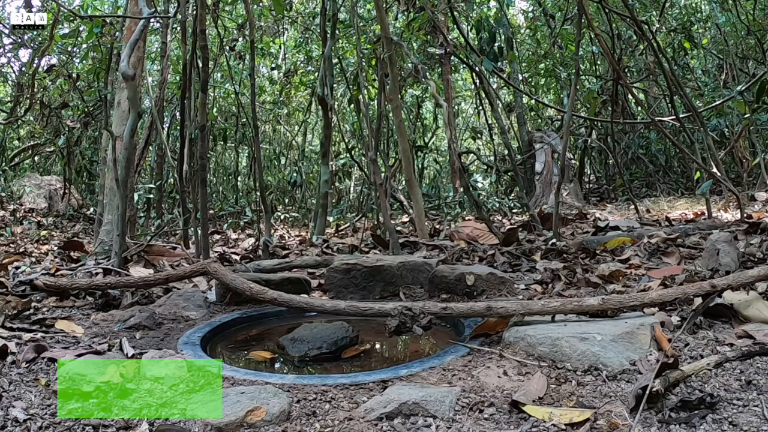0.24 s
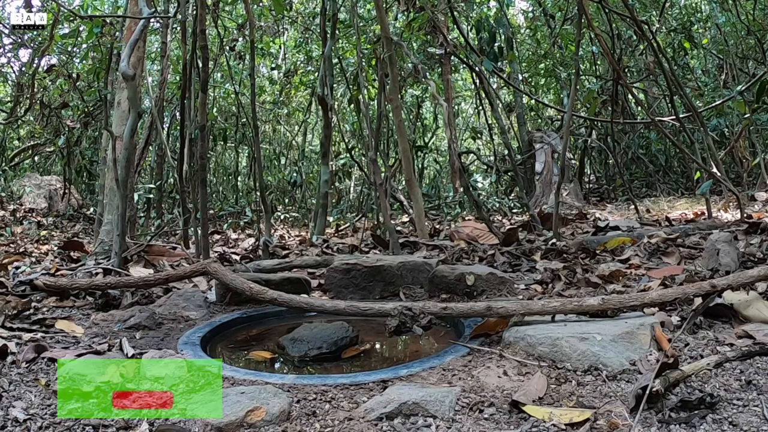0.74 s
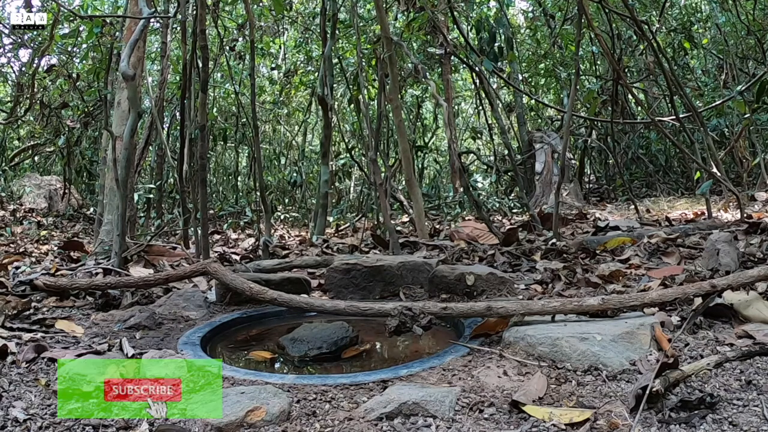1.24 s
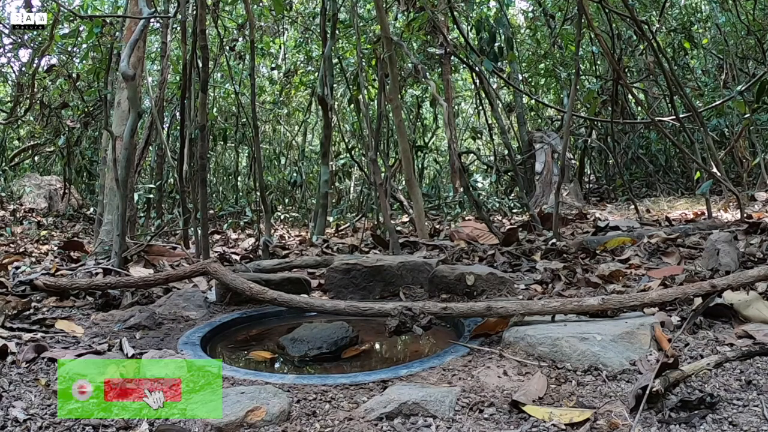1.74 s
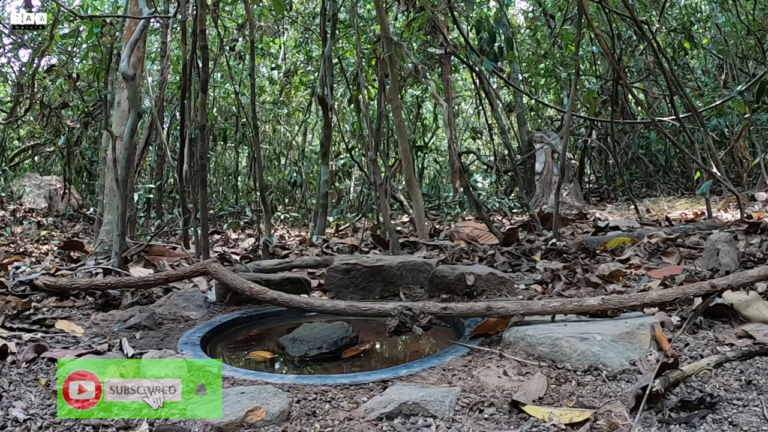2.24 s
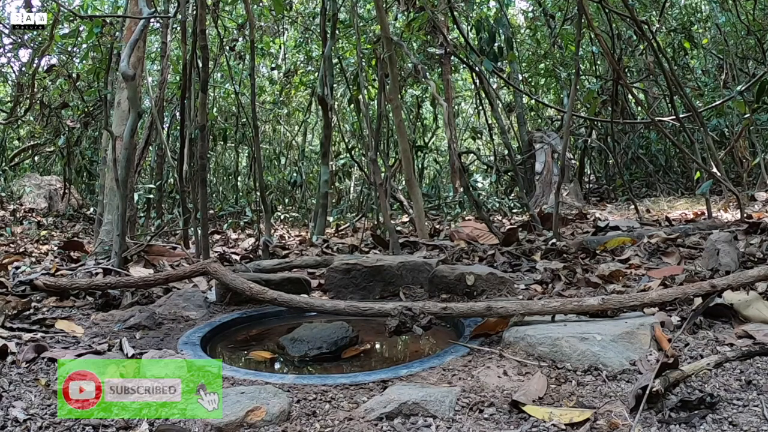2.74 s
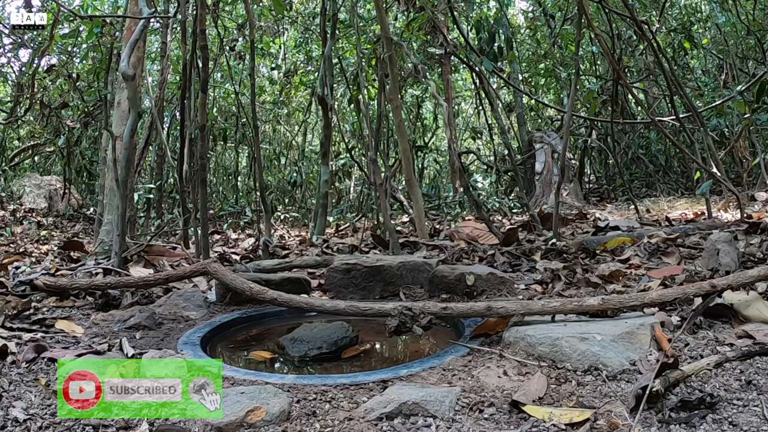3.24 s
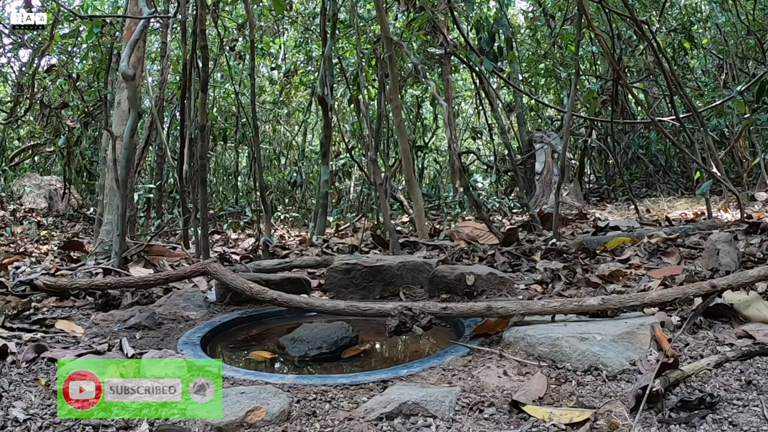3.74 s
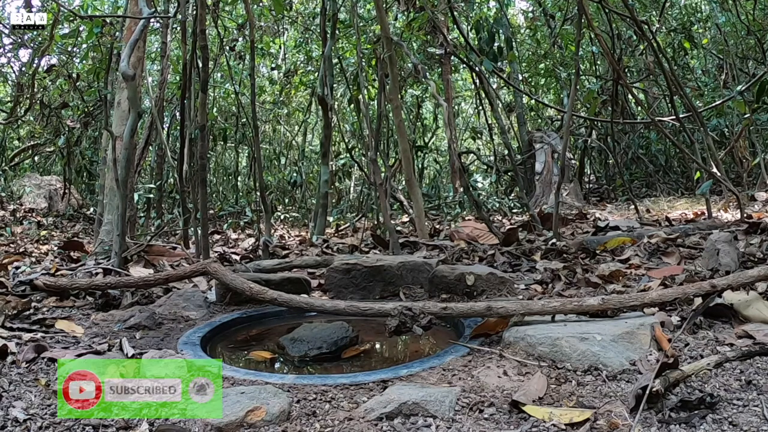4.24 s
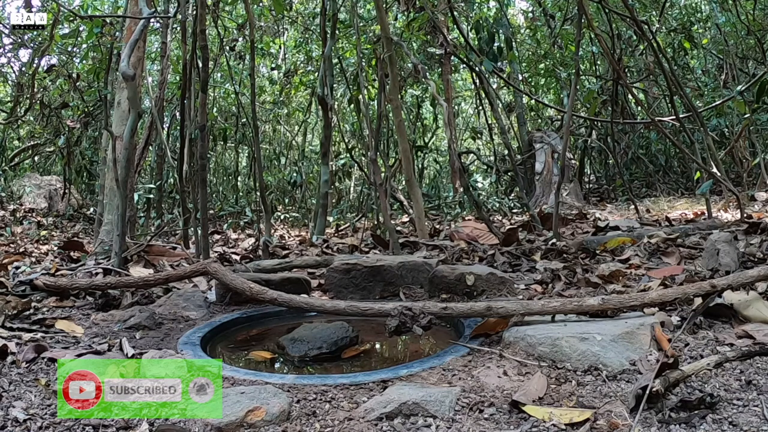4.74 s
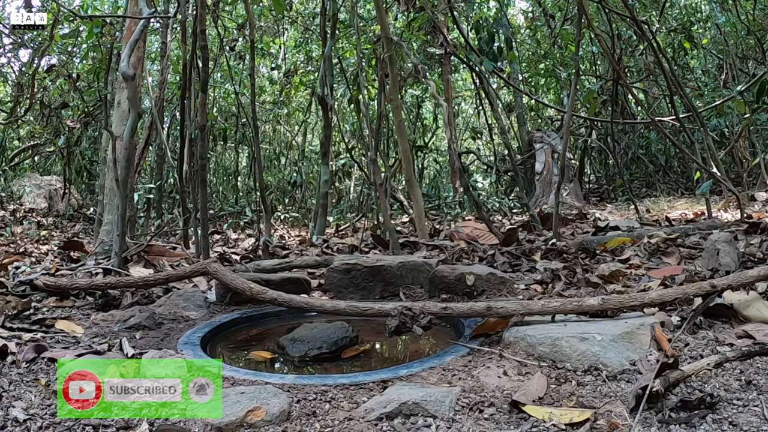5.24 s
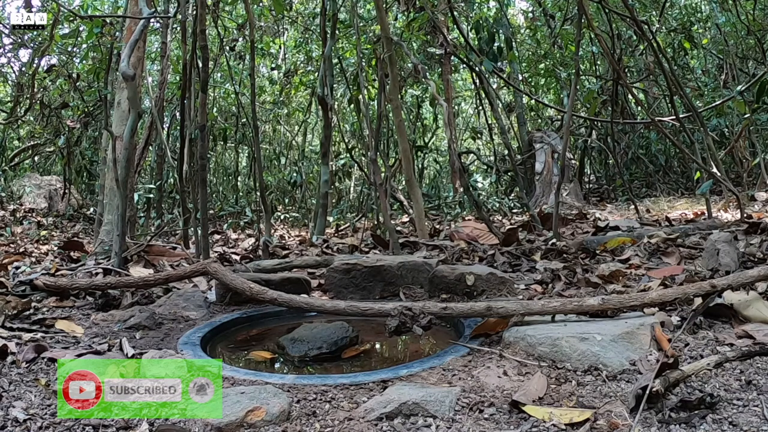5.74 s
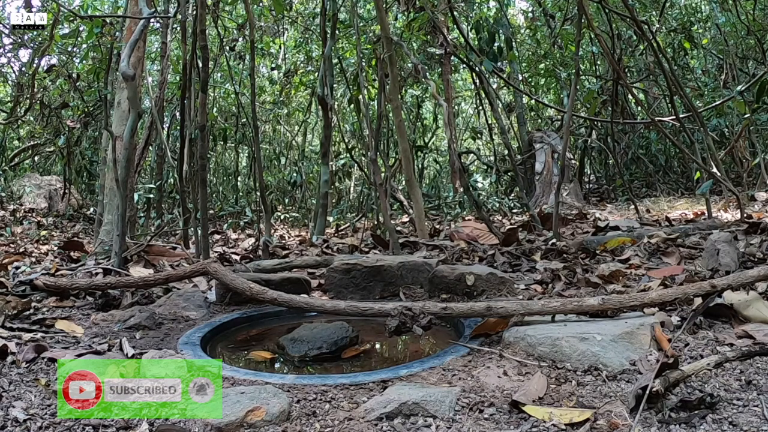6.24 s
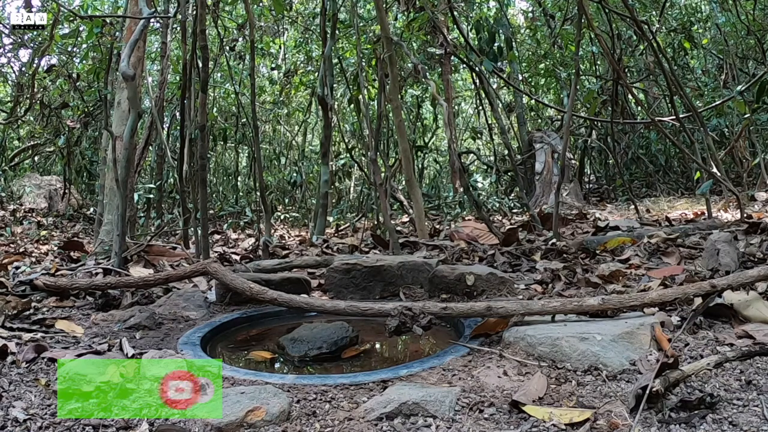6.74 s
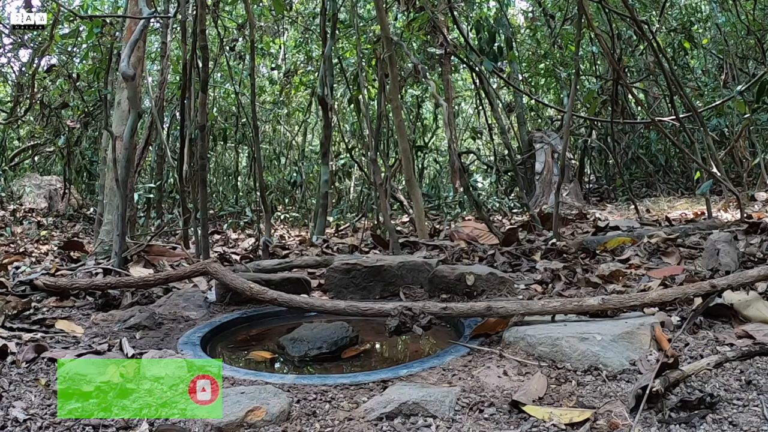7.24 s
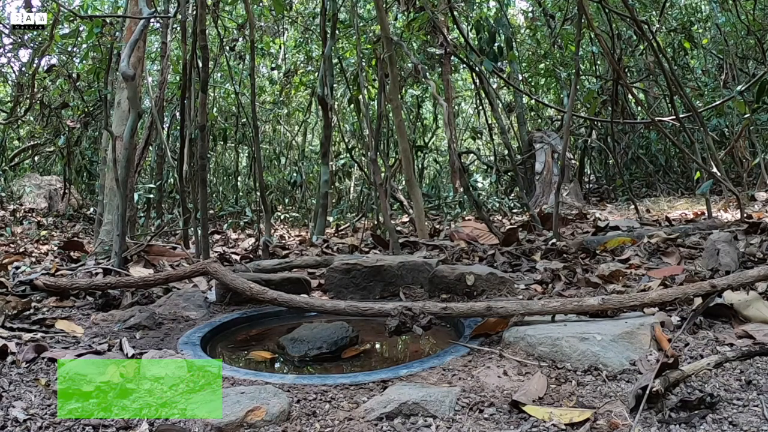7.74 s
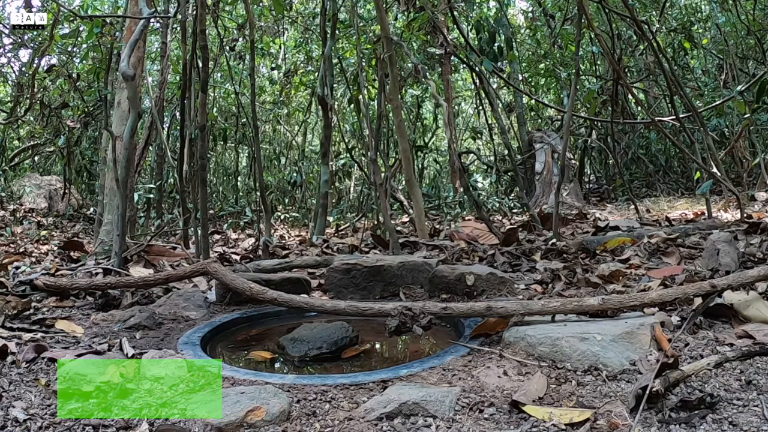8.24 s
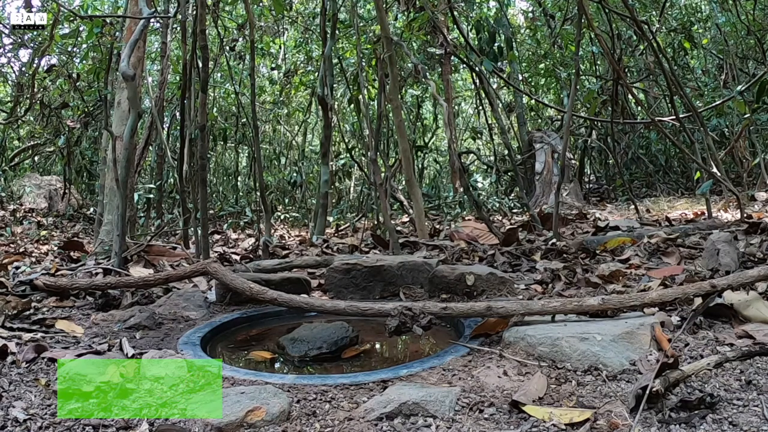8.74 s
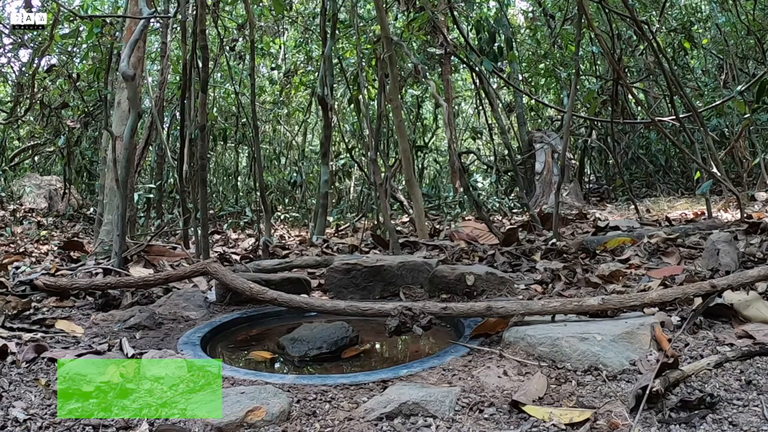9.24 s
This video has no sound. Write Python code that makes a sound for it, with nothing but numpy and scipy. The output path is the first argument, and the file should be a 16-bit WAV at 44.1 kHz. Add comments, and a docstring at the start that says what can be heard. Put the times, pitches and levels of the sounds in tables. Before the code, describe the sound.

Quiet forest floor in stereo. A close bird repeats a short nasal call snapping upward into a whip, seven times in the first few seconds. A soft dove-like three-note hoot comes early, midway and near the end. Thin whistles and hoarse slurs echo among far trees; later come harsh close chirps, a low woody chuck and rattling trills. Brief wing flutters, dry leaf crackle and faint insects fill the gaps.

```python
"""Forest floor beside a water dish, two microphones: a near bird gives seven nasal calls ending in a whip.
A dove-like bird hoots a three-note phrase; others pipe, chirp, chuck, whistle, slur and trill, near and far.
Bird voices are gliding tones or harmonic stacks with shaken pitch; wings, leaves and air are coloured noise.
Insects throb in narrow noise bands over a low hum, and a faint drone swells near the end.
Echoes from trunks and leaves surround the birds, the wings, the stirred leaves and the drone."""
import sys
import numpy as np
from scipy import signal
from scipy.fft import rfft, irfft, next_fast_len
from scipy.io import wavfile

SR = 44100
rng = np.random.default_rng(int(sys.argv[2]) if len(sys.argv) > 2 else 0)


def log_audio(samples):
    """Write samples as a 16-bit WAV file to the path given in sys.argv[1]."""
    # one column per channel
    frames = np.atleast_2d(samples).T
    # limit to full scale, then quantise
    limited = np.clip(frames, -1, 1)
    pcm = np.round(limited * 32767).astype(np.int16)
    wavfile.write(sys.argv[1], SR, pcm)


N = 418950  # samples, 9.5 s

# In all tables: pan_db is left over right, echo_db is echo over direct sound, rough shakes the pitch.

# near bird, one row per call: start_s, whip_start_s, lead_db, pip_hz, pip_db, whip_length_s, whip_top_hz,
# climb_time (share of whip), whip_db, whip_echo_db, pan_db; its levels are before the bird's overall gain
WHIP_CALLS = [(1.018, 1.082, -26.5, 3400, -19.5, .027, 5020, .45, -16, -3.5, 4),
              (1.228, 1.299, -28.5, 3200, -28.5, .029, 4570, .3, -18, 0, 5),
              (1.530, 1.602, -31, 3150, -26, .029, 4260, .22, -19, .5, 1),
              (1.724, 1.790, -32, 3150, -27.5, .028, 4200, .24, -23.5, 1, 3),
              (1.954, 2.022, -32, 3000, -28.5, .026, 4150, .2, -21.5, 1.5, 2),
              (2.548, 2.617, -34, 3250, -33, .03, 4000, .2, -28.5, 1.5, 2),
              (3.244, 3.309, -34.5, 3200, -31, .024, 4400, .18, -32.5, 1.5, 0)]
PIP_S, PIP_LEAD_S, PIP_FALL_HZ = .015, .016, 220
WHIP_CLIMB = .19  # the whip starts this share below its top
CRACK_S = .004  # the voice cracks between pip and whip
# nasal lead-in: time (share of its length), pitch_hz (before a small wander), relative level_db, rough (0-1)
LEAD_IN = [(0, 720, -10, .1), (.08, 750, -4, .1), (.22, 780, -4, .12), (.36, 750, -7, .3),
           (.48, 780, -7, .7), (.6, 880, -7, .6), (.7, 930, -3, .2), (.86, 870, 0, .2), (1, 820, -4, .35)]
# resonance of the nasal throat: freq_hz, relative level_db
NASAL_THROAT = [(700, -38), (1200, -24), (1500, -9), (1800, -4), (2300, -4), (2700, 0), (3100, 1),
                (3700, -12), (4400, -28), (8000, -40)]

# hooted phrases: start_s, level_db
HOOT_PHRASES = [(1.627, -36), (5.131, -36), (8.364, -36)]
# grace note and three scooped hoots: start_s (in the phrase), length_s, start_hz, middle_hz, end_hz,
# level_db (relative to the phrase)
HOOTS = [(-.004, .05, 890, 810, 790, -10.5), (.038, .112, 915, 815, 805, 1), (.23, .112, 795, 716, 805, -1),
         (.4, .145, 690, 745, 845, 0.2)]
HOOT_EDGES = .8  # share of a hoot spent swelling and fading

# clear piping notes near 1 kHz: start_s, length_s, start_hz, end_hz, level_db (where the swell ends),
# overtone_db (relative), pan_db
PIPES = [(.05, .05, 1150, 1270, -56, -20, 0), (.105, .03, 1300, 980, -53, -20, 0),
         (.16, .04, 1230, 980, -56, -20, 0), (1.63, .158, 1070, 1035, -37.5, -25, 0),
         (1.782, .065, 950, 800, -43, -25, 0), (3.98, .06, 1020, 940, -46, -11, -8),
         (8.078, .035, 1100, 1140, -53, -20, 0), (8.215, .158, 1045, 1065, -41.5, -20, 0),
         (8.366, .038, 1010, 810, -45, -20, 0)]
# run of sharp close chirps: start_s, length_s, start_hz, middle_hz, end_hz, level_db, rough (0 pure, 1 harsh)
CHIRPS = [(6.247, .042, 2150, 2600, 2650, -34, 1), (6.281, .02, 1500, 2250, 1850, -37, .25),
          (6.331, .027, 1650, 2100, 2850, -35, .55), (6.356, .043, 1550, 3000, 1100, -30, .08)]
# chirp harmonics, from the first up: pure_db, harsh_db (added in proportion to rough)
CHIRP_PARTIALS = [(-22, 13), (0, 0), (-13, 9), (-22, 8)]
# colour of the chirping beak: freq_hz, relative level_db
CHIRP_BEAK = [(1500, -3), (4000, 0), (7800, -1), (9000, -15), (14000, -28)]
# falling harmonic chucks: start_s, length_s, start_hz, end_hz, level_db (before the fall), throat_factor (pitch),
# pan_db, echo_db
CHUCKS = [(4.93, .065, 490, 370, -43, .78, -7, 0), (6.996, .072, 445, 296, -29, 1.0, -2, -14),
          (7.212, .055, 450, 330, -47, .72, -7, -4), (7.505, .05, 450, 330, -55, .66, -2, 2),
          (8.365, .055, 490, 380, -46, .66, 2, -4), (9.075, .06, 460, 350, -45, .66, -5, -4)]
# resonance of the chucking throat before it shifts: freq_hz, relative level_db
CHUCK_THROAT = [(440, -42), (860, -11), (1300, -14), (1750, -7), (2200, -7), (2650, 2), (3050, 2),
                (3450, -12), (3900, -6), (4400, -19), (5100, -40)]

# long whistles that swoop down and creep up again: start_s, level_db
SWOOPS = [(.548, -45), (2.137, -46.5)]
# shape of a swoop: time_s (in the call), pitch_hz, relative level_db, quaver (share of the pitch)
SWOOP_SHAPE = [(0, 2850, -12, 0), (.014, 3280, -4, 0), (.034, 3230, -2, 0), (.05, 2720, -5, 0),
               (.08, 2480, -6, 0), (.09, 2250, -16, 0), (.099, 2080, -1, 0), (.125, 1800, 0, 0),
               (.165, 1770, 2, .01), (.2, 1880, -1, .06), (.28, 2000, -2, .07), (.34, 2050, -9, .05)]
QUAVER_HZ = 52
# thin far whistles: start_s, length_s, start_hz, end_hz, level_db
THIN_WHISTLES = [(.235, .035, 1750, 1800, -52), (2.33, .2, 2930, 3000, -55), (2.79, .18, 1960, 1880, -51.5),
                 (2.98, .12, 1820, 1680, -55), (3.145, .08, 3950, 3650, -48),
                 (3.52, .07, 2420, 2500, -44.5), (3.6, .25, 2500, 2830, -55), (3.9, .08, 3580, 3500, -55),
                 (4.375, .06, 1400, 1280, -50), (6.0, .045, 3750, 3650, -41),
                 (6.66, .18, 2250, 2020, -51.5), (6.87, .12, 2400, 2450, -54), (7.47, .06, 6750, 6800, -49),
                 (7.99, .29, 3120, 3020, -50), (9.135, .1, 3080, 3350, -40.5)]
# hoarse far slides up or down: start_s, length_s, start_hz, end_hz, level_db
HOARSE_CALLS = [(0.0, .05, 2900, 2300, -45), (.045, .08, 2450, 3250, -40.5), (.26, .08, 2600, 2150, -51),
                (.94, .08, 3500, 2700, -49), (3.285, .1, 2700, 1700, -36.5), (3.44, .07, 3100, 2900, -46.5),
                (4.285, .08, 2650, 2100, -43.5), (4.46, .12, 4600, 3800, -43.5),
                (4.57, .14, 4000, 2750, -46), (5.32, .12, 4700, 2850, -45.5), (5.945, .09, 2200, 3000, -43),
                (5.955, .09, 4300, 3750, -39.5), (5.97, .07, 4800, 6100, -42), (6.43, .12, 4300, 2700, -47),
                (7.32, .06, 3000, 4800, -50), (7.35, .08, 5400, 6400, -43), (8.565, .11, 4700, 2700, -42.5),
                (9.02, .05, 2700, 3400, -44), (9.1, .07, 2700, 3150, -41.5), (9.12, .1, 4000, 4700, -52),
                (9.1, .08, 1900, 2700, -46), (9.46, .06, 2800, 3100, -46)]
# a far bird repeats one slurred call: start_s, level_db, pan_db
FAR_CALLS = [(4.27, -48, 3), (4.71, -41.5, 2), (5.1, -39.5, 4), (5.525, -41, 4), (6.045, -41.5, 5),
             (6.455, -42, 5), (8.41, -41, 1)]
# shape of that slur: time_s (in the call), pitch_hz, relative level_db
FAR_SLUR = [(0, 1450, -3), (.014, 1760, -1), (.032, 2050, -3), (.04, 1550, -1), (.05, 2000, 3),
            (.06, 2350, -4), (.074, 1800, 1), (.09, 1600, -6), (.098, 1080, -15), (.125, 1380, -6),
            (.16, 1400, -9)]
# trills: start_s, length_s, start_hz, end_hz, notes_per_s, sweep (fall of a note, share of pitch), rough (0-1),
# level_db, pan_db, echo_db; pitches are those the falling notes pass through
TRILLS = [(6.047, .19, 3480, 3060, 44, .07, .3, -37, 6, 0),
          (8.025, .3, 2560, 2300, 30.2, .2, .55, -45.5, -5, 2),
          (8.025, .27, 3700, 3330, 30.2, .12, .45, -47.5, -2, 3),
          (8.324, .365, 2400, 2360, 29.3, .17, .5, -43.3, -5, 1),
          (8.324, .375, 3160, 3020, 29.3, .14, .5, -44.7, -2, 3)]

# bursts of wingbeats: first_stroke_s, length_s, strokes_per_s, level_db, swell_db, stroke_width_s, pan_db,
# swish_db (relative)
FLIGHTS = [(.833, .125, 28.4, -32, 4, .0036, -6, -12), (1.724, .62, 18.5, -42, 2, .003, 0, -20),
           (4.454, .125, 27.7, -30.5, 7, .005, -6, -5)]
# colour of the feather hiss: freq_hz, relative level_db
WING_COLOUR = [(600, -25), (1500, -11), (3000, -13), (5000, -6), (6900, 1), (8200, -4), (10000, -19),
               (15000, -36)]
# a bird flies close past the microphones
PASS_S, PASS_LENGTH_S, PASS_BEATS_PER_S, PASS_DB = 2.895, .11, 23.8, -40

# dry leaves stirred: start_s, length_s, level_db (at the peak of the burst)
RUSTLES = [(.42, .15, -55), (1.7, .75, -48), (2.96, .26, -45.5), (3.18, .5, -48), (3.71, .05, -44),
           (3.87, .05, -48), (3.98, .45, -47.5), (5.63, .22, -49.5), (5.98, .25, -43), (6.243, .1, -40.5),
           (6.33, .08, -44), (7.035, .18, -43.5), (7.2, .25, -52), (7.72, .18, -53), (8.86, .09, -54)]
# colour of dry leaves: freq_hz, relative level_db
LEAF_COLOUR = [(500, -18), (1500, -6), (3000, -1), (6000, 0), (8200, -2), (10000, -14), (15000, -31)]
# insect choirs: centre_hz, half_width_hz, level_db, pan_db, throbs_per_s (on average), throb_depth (0-1)
INSECTS = [(6300, 260, -58, -3, 9, .15), (5700, 450, -62, -2, 13, .1), (7700, 420, -59.5, -5, 21, .3)]
# distant hum and air of the forest: freq_hz, relative level_db (per Hz)
AIR_COLOUR = [(20, -1.7), (60, -1.5), (120, -7), (150, 10.5), (200, 8.5), (290, 1), (450, -7.5),
              (620, -4.5), (780, 0), (1100, -9), (2500, -8.5), (4100, -11.5), (5000, -10.5), (8700, -14.5),
              (10500, -39), (15500, -52)]
# likeness of the air at the two microphones: freq_hz, likeness (-1 opposite, 1 alike)
AIR_LIKENESS = [(30, .4), (100, .1), (160, -.4), (300, -.15), (750, -.5), (1500, -.15), (4000, 0)]
# faint far drone: time_s, level_db
DRONE_LEVEL = [(8.6, -72), (8.76, -58), (9.05, -68), (9.35, -62), (9.5, -62)]
DRONE_HZ, DRONE_SAG_HZ_PER_S = 305, 25
# colour of the drone: freq_hz, relative level_db
DRONE_COLOUR = [(300, 0), (600, -9), (900, -11), (1500, -8), (2000, -18)]

# decay of the forest echo: freq_hz, t60_s (without the extra early echoes)
FOREST_T60 = [(200, .8), (800, .88), (2000, .9), (4500, .65), (9000, .45)]
EDGE_HZ = 15650  # upper band limit of the recorder


def amp(db):
    """Amplitude factor of a level in dB."""
    return 10 ** (np.asarray(db) / 20)


def evened(x):
    """Scale to rms 1."""
    return x / np.sqrt(np.mean(np.abs(x) ** 2) + 1e-20)


def read(points, hz):
    """A spectrum joined by straight lines on a log-frequency axis."""
    f, value = np.transpose(points)
    return np.interp(np.log(hz + 1), np.log(f + 1), value)


def follow(rows):
    """Start time and the columns of a curve at every sample."""
    time_s, *columns = np.transpose(rows)
    t = np.arange(time_s[0], time_s[-1], 1 / SR)
    return (time_s[0], *(np.interp(t, time_s, c) for c in columns))


def add(mix, start_s, sound):
    """Lay a sound into the mix, cut off at its end."""
    part = mix[:, max(round(start_s * SR), 0):][:, :sound.shape[1]]
    part += sound[:, :part.shape[1]]


def noise(n, colour_db):
    """Noise of rms 1 whose spectrum is a function of frequency."""
    size = next_fast_len(n + 2048)
    spectrum = rfft(rng.standard_normal(size)) * amp(colour_db(np.fft.rfftfreq(size, 1 / SR)))
    return evened(irfft(spectrum, size))[:n]


def wander(n, rate_hz):
    """Smooth chance of rms 1."""
    return noise(n, lambda f: -10 * (f / rate_hz) ** 2)


def turns(hz):
    """Phase in radians of a changing pitch."""
    return 2 * np.pi * np.cumsum(hz) / SR


def fade(n, share):
    """Raised-cosine edges that together fill a share of the length."""
    return signal.windows.tukey(n, np.clip(share, 0, 1))


def arch(length_s, start_hz, middle_hz, end_hz):
    """A pitch that curves through three points."""
    curve = np.polyfit([0, .5, 1], [start_hz, middle_hz, end_hz], 2)
    return np.polyval(curve, np.linspace(0, 1, round(length_s * SR)))


def slide(length_s, start_hz, end_hz, halfway):
    """A pitch glide that has covered the given share of its way at half time."""
    return arch(length_s, start_hz, start_hz + halfway * (end_hz - start_hz), end_hz)


def whistle(hz, rough, overtone_db=-30, jitter=.07, jitter_hz=260):
    """A nearly pure syrinx tone; roughness shakes its pitch."""
    phase = turns(hz * (1 + jitter * rough * wander(len(hz), jitter_hz)))
    return np.sqrt(2) * (np.sin(phase) + amp(overtone_db) * np.sin(2 * phase))


def note(hz, db, rough, edges, overtone_db=-36, jitter=.1):
    """One whistled note that swells, holds and fades."""
    return amp(db) * whistle(hz, rough, overtone_db, jitter) * fade(len(hz), edges)


def reedy(hz, rough, throat, jitter=.13, jitter_hz=350, shimmer_db=3, shimmer_hz=70, smear=.35, count=14,
          throat_shift=1):
    """A harmonic voice whose partials slide through a throat that smears each pulse; each flickers by itself."""
    phase = turns(hz * (1 + jitter * rough * wander(len(hz), jitter_hz)))
    voice = np.zeros(len(hz))
    for k in range(1, count):
        partial_db = read(throat, k * hz / throat_shift) + shimmer_db * wander(len(hz), shimmer_hz)
        voice += amp(partial_db) * np.cos(k * phase - smear * k * k / 2)
    return evened(voice)


def scatter(early_db=7, early_s=.05, build_s=.012):
    """Echoes from trunks and leaves for one perch: dense near ones, then a long faint tail."""
    taps = rng.standard_normal((2, SR)) * (rng.random((2, SR)) < 2500 / SR)
    taps[1] = .25 * taps[0] + .97 * taps[1]  # the two microphones share a little
    hz, t, z = signal.stft(taps, SR, nperseg=256)
    decay_db = -60 * t / read(FOREST_T60, hz)[:, None]
    z = z * amp(decay_db + early_db * np.exp(-t / early_s)) * (1 - np.exp(-t / build_s))
    z /= np.sqrt(np.sum(np.abs(z) ** 2, axis=2, keepdims=True))  # equal energy at all frequencies
    tail = signal.istft(z, SR, nperseg=256)[1]
    return tail / np.linalg.norm(tail, axis=1, keepdims=True)


def perched(sound, pan_db, echo_db, lag_per_db=6e-6, echo_pan=.6, early_db=6.5, early_loss=.55):
    """Direct sound reaches the nearer microphone first; echoes surround it and linger more from far perches."""
    size = next_fast_len(len(sound) + SR, real=True)
    side = np.array([[.5], [-.5]]) * pan_db
    lead_s = side * lag_per_db
    direct = amp(side) * np.exp(2j * np.pi * np.fft.rfftfreq(size, 1 / SR) * lead_s)
    echoes = rfft(scatter(early_db - early_loss * max(echo_db, 0)), size)
    paths = (direct + amp(echo_db + echo_pan * side) * echoes) / np.hypot(1, amp(echo_db))
    return irfft(rfft(sound, size) * paths, size)


def wingbeats(start_s, length_s, rate, swell_db, skew=1.3):
    """Time and level of evenly spaced strokes, strongest just past the middle of the burst."""
    times = np.arange(start_s, start_s + length_s, 1 / rate)
    u = (np.arange(len(times)) + .5) / len(times)
    return zip(times, swell_db * (np.sin(np.pi * u ** skew) - 1))


def whip_bird(lead_echo_db=-.4, rasp_db=-11, gain_db=0.6, held_rough=.3, break_rough=.4, pip_echo_db=-3,
              sag_db=4.5, crack_db=-19):
    """A nasal lead-in narrows to a clear pip; the voice cracks, whips upward and stops near its top note."""
    out = np.zeros((2, N))
    share, *shape = np.transpose(LEAD_IN)
    for (start_s, whip_s, lead_db, pip_hz, pip_db, length_s, top_hz, climb_time, whip_db, whip_echo_db,
         pan_db) in WHIP_CALLS:
        u = np.linspace(0, 1, round((whip_s - start_s) * SR))
        hz, db, rough = (np.interp(u, share, c) for c in shape)
        hz = hz * (1 + .025 * wander(len(u), 35))  # no two calls are quite alike
        lead = amp(lead_db + db) * reedy(hz, rough, NASAL_THROAT, shimmer_db=2) * fade(len(u), .08)
        add(out, start_s, perched(lead, pan_db, lead_echo_db))

        pip = note(slide(PIP_S, pip_hz + PIP_FALL_HZ, pip_hz, .6), pip_db, .3, .6)
        add(out, whip_s - PIP_LEAD_S, perched(pip, pan_db, pip_echo_db))

        crack_hz = slide(CRACK_S, pip_hz, 1.3 * top_hz, .4)
        crack = note(crack_hz, whip_db + crack_db, 1.8, .8, overtone_db=-20)
        add(out, whip_s - CRACK_S, perched(crack, pan_db, whip_echo_db))

        u = np.linspace(0, 1, round(length_s * SR))
        hz = top_hz * (1 - WHIP_CLIMB * np.exp(-u / climb_time))
        breaking = np.exp(-u / .12)  # the voice is still unsteady just after the crack
        tone = whistle(hz, held_rough + break_rough * breaking, overtone_db=-37, jitter_hz=400)
        rasp = amp(rasp_db - 5 * u) * whistle(.8 * hz, 1.7)  # the other side of the syrinx rattles below it
        whip = amp(whip_db - sag_db * u) * (tone + rasp) * fade(len(u), .3)
        add(out, whip_s, perched(whip, pan_db, whip_echo_db))
    return amp(gain_db) * out


def hooting_bird(echo_db=-6.8):
    """A grace note and three soft scooped hoots, the same from the same perch each time."""
    phrase, out = np.zeros((1, SR)), np.zeros((2, N))
    for start_s, length_s, start_hz, middle_hz, end_hz, db in HOOTS:
        hz = arch(length_s, start_hz, middle_hz, end_hz)
        add(phrase, start_s, note(hz, db, .04, HOOT_EDGES, overtone_db=-36)[None])
    heard = perched(phrase[0], 0, echo_db)
    for start_s, db in HOOT_PHRASES:
        add(out, start_s, amp(db) * heard)
    return out


def piping_bird(rough=.14, bend=.012, edges=.45, swell_db=6, flutter_db=1.5, echo_db=-5):
    """Soft piping notes that swell toward their end and arch a little in pitch."""
    out = np.zeros((2, N))
    for start_s, length_s, start_hz, end_hz, db, overtone_db, pan_db in PIPES:
        hz = arch(length_s, start_hz, (1 + bend) * (start_hz + end_hz) / 2, end_hz)
        level_db = db + np.linspace(-swell_db, 0, len(hz)) + flutter_db * wander(len(hz), 30)
        add(out, start_s, perched(note(hz, level_db, rough, edges, overtone_db), pan_db, echo_db))
    return out


def chirping_bird(edges=.3, pan_db=1.5, echo_db=-2, jitter=.06, jitter_hz=700):
    """Chirps sweep in curves, strongest on the second harmonic; harsh ones spread into the others."""
    out = np.zeros((2, N))
    for start_s, length_s, start_hz, middle_hz, end_hz, db, rough in CHIRPS:
        hz = arch(length_s, start_hz, middle_hz, end_hz)
        phase = turns(hz * (1 + jitter * rough * wander(len(hz), jitter_hz)))
        voice = np.zeros(len(hz))
        for k, (pure_db, harsh_db) in enumerate(CHIRP_PARTIALS, 1):
            partial_db = pure_db + rough * harsh_db + read(CHIRP_BEAK, k * hz)
            voice += amp(partial_db) * np.sin(k * phase)
        add(out, start_s, perched(amp(db) * evened(voice) * fade(len(hz), edges), pan_db, echo_db))
    return out


def chucks(rough=.12, fall_db=20, fall_share=.85, throat_follows=.7, smear=.7, bounce_s=.008, bounce_db=-6):
    """A stack of harmonics drops in pitch and dies away while the throat sinks with it."""
    out = np.zeros((2, N))
    for start_s, length_s, start_hz, end_hz, db, throat_factor, pan_db, echo_db in CHUCKS:
        u = np.linspace(0, 1, round(length_s * SR))
        hz = end_hz + (start_hz - end_hz) * np.cos(np.pi / 2 * np.minimum(u / fall_share, 1)) ** 2
        throat_shift = throat_factor * (hz / start_hz) ** throat_follows
        voice = reedy(hz, rough * (1 + 3 * u ** 2), CHUCK_THROAT, jitter_hz=600, shimmer_db=3, smear=smear,
                      count=16, throat_shift=throat_shift)
        call = amp(db - fall_db * u ** 3) * voice * fade(len(u), .3)
        add(out, start_s, perched(call, pan_db, echo_db))
        # the ground throws it back
        add(out, start_s + bounce_s, perched(amp(bounce_db) * call, pan_db, echo_db))
    return out


def swooping_bird(echo_db=0):
    """A high note tips over and slides down to a low one, which creeps upward and starts to quaver."""
    out = np.zeros((2, N))
    _, hz, shape_db, quaver = follow(SWOOP_SHAPE)
    hz = hz * (1 + quaver * np.sin(turns(np.full(len(hz), float(QUAVER_HZ)))))
    for start_s, db in SWOOPS:
        add(out, start_s, perched(note(hz, db + shape_db, .15, .05), 0, echo_db))
    return out


def thin_whistlers(rough=.32, halfway=.45, edges=.35, pan_db=1.5, echo_db=4):
    """Faint gliding whistles deep among the trees, more echo than direct sound."""
    out = np.zeros((2, N))
    for start_s, length_s, start_hz, end_hz, db in THIN_WHISTLES:
        call = note(slide(length_s, start_hz, end_hz, halfway), db, rough, edges)
        add(out, start_s, perched(call, pan_db, echo_db))
    return out


def hoarse_birds(rising_rough=.6, falling_rough=1.2, halfway=.72, rising_edges=.45, falling_edges=.95,
                 pan_db=3.5, echo_db=7.5):
    """Rough slides that level off, mostly echo; the falling ones are harsher and swell in gradually."""
    out = np.zeros((2, N))
    for start_s, length_s, start_hz, end_hz, db in HOARSE_CALLS:
        rising = end_hz > start_hz
        rough, edges = (rising_rough, rising_edges) if rising else (falling_rough, falling_edges)
        call = note(slide(length_s, start_hz, end_hz, halfway), db, rough, edges)
        add(out, start_s, perched(call, pan_db, echo_db))
    return out


def far_bird(rough=.75, echo_db=6):
    """A quick zigzag slur, blurred by the trees."""
    out = np.zeros((2, N))
    _, hz, shape_db = follow(FAR_SLUR)
    for start_s, db, pan_db in FAR_CALLS:
        call = amp(db + shape_db) * whistle(hz, rough, overtone_db=-22) * fade(len(hz), .1)
        add(out, start_s, perched(call, pan_db, echo_db))
    return out


def trills(snap=.42, uneven=.04, flicker_db=2, bounce_s=.014, bounce_db=-7):
    """Runs of tiny falling notes, a little uneven and sinking in pitch; a nearby trunk doubles each one."""
    out = np.zeros((2, N))
    for start_s, length_s, start_hz, end_hz, rate, sweep, rough, db, pan_db, echo_db in TRILLS:
        n = len(np.arange(0, length_s, 1 / SR))
        hz = np.linspace(start_hz, end_hz, n)
        beat = np.cumsum(rate * (1 + uneven * wander(n, 20))) / SR % 1  # 0 to 1 through each note
        pulse = np.sin(np.pi * beat ** snap) ** 4  # each note starts sharply and dies before the next
        loudness = evened(pulse * amp(flicker_db * wander(n, 25)))
        notes = amp(db) * loudness * whistle(hz * (1 + sweep * (.22 - beat)), rough) * fade(n, .07)
        add(out, start_s, perched(notes, pan_db, echo_db))
        add(out, start_s + bounce_s, perched(amp(bounce_db) * notes, 0, echo_db))
    return out


def wings(swish_low_hz=900, swish_high_hz=1600, hiss_db=2.5, echo_db=-7):
    """Feathers hiss at the fastest point of each stroke; a low swish rises and falls with their speed."""
    out, t = np.zeros((2, N)), np.arange(-SR // 40, SR // 40) / SR
    for first_s, length_s, rate, db, swell_db, width_s, pan_db, swish_db in FLIGHTS:
        speed = np.exp(-np.abs(t) / (1.4 * width_s))
        swish_hz = swish_low_hz + (swish_high_hz - swish_low_hz) * speed
        for stroke_s, stroke_db in wingbeats(first_s, length_s, rate, swell_db):
            hiss = speed * noise(len(t), lambda f: read(WING_COLOUR, f))
            swish = whistle(swish_hz, 1.5) * np.exp(-((t + .003) / .009) ** 2)
            both = amp(hiss_db) * hiss + amp(swish_db) * swish
            stroke = amp(db + stroke_db) * both * fade(len(t), .3)
            add(out, stroke_s + t[0], perched(stroke, pan_db, echo_db))
    return out


def thuds(hz=168, width_s=.009):
    """Each close wingbeat pushes a short low puff of air."""
    out, t = np.zeros((2, N)), np.arange(-SR // 30, SR // 30) / SR
    for stroke_s, db in wingbeats(PASS_S, PASS_LENGTH_S, PASS_BEATS_PER_S, swell_db=2.5):
        puff = np.exp(-np.abs(t) / width_s) * whistle(np.full(len(t), float(hz)), 2.8, overtone_db=-18)
        add(out, stroke_s + t[0], perched(amp(PASS_DB + db) * puff, 0, -12))
    return out


def leaves(crackle_db=3.8, crackle_hz=500, clump_db=2.3, clump_hz=25, peak_early=.7):
    """Fine crackle in the leaf litter, in uneven clumps; each burst swells quickly and settles slowly."""
    out = np.zeros((2, N))
    for start_s, length_s, db in RUSTLES:
        n = round(length_s * SR)
        stir = evened(amp(crackle_db * wander(n, crackle_hz) + clump_db * wander(n, clump_hz)))
        crackle = stir * noise(n, lambda f: read(LEAF_COLOUR, f))
        swell = np.sin(np.pi * np.linspace(0, 1, n) ** peak_early)
        add(out, start_s, perched(amp(db) * crackle * swell, 0, 0))
    return out


def leaf_ticks(per_s=12, db=-37, spread_db=3, decay_s=.003, echo_db=-2):
    """Single dry leaves tick faintly at random, left and right, as short decaying noise."""
    t, out = np.arange(SR // 40) / SR, np.zeros((2, N))
    for pan_db in (-5, 5):
        ticks = (rng.random(N) < per_s / 2 / SR) * amp(spread_db * np.minimum(rng.exponential(1, N), 3))
        snap = noise(len(t), lambda f: read(LEAF_COLOUR, f)) * np.exp(-t / decay_s)
        ticking = signal.oaconvolve(ticks, snap / np.linalg.norm(snap))
        add(out, 0, perched(amp(db) * ticking, pan_db, echo_db))
    return out


def insects():
    """Many far insects merge into narrow bands that throb unevenly."""
    out = np.zeros((2, N))
    for hz, width_hz, db, pan_db, rate, depth in INSECTS:
        throb = 1 + depth * np.sin(turns(rate * (1 + .35 * wander(N, 8))))
        throb = throb * amp(1.7 * wander(N, 5))
        for channel, side in enumerate([.5, -.5]):
            band = noise(N, lambda f: -10 * np.log10(1 + ((f - hz) / width_hz) ** 4))
            out[channel] += amp(db + side * pan_db) * throb * band
    return out


def drone(rough=.6, echo_db=6):
    """A faint far harmonic drone that wavers and sags in pitch."""
    out = np.zeros((2, N))
    start_s, db = follow(DRONE_LEVEL)
    hz = DRONE_HZ - DRONE_SAG_HZ_PER_S * np.arange(len(db)) / SR
    voice = reedy(hz, rough, DRONE_COLOUR, jitter_hz=30, count=7)
    add(out, start_s, perched(amp(db) * voice, 0, echo_db))
    return out


def air(db=-53.8, swell_db=.8):
    """A far low hum under a faint wash, partly shared by the two microphones."""
    def likeness(f):
        return np.clip(read(AIR_LIKENESS, f), -.95, .95)

    mid = noise(N, lambda f: read(AIR_COLOUR, f) + 10 * np.log10(1 + likeness(f)))
    side = noise(N, lambda f: read(AIR_COLOUR, f) + 10 * np.log10(1 - likeness(f)))
    return amp(db + swell_db * wander(N, 2)) * np.array([mid + side, mid - side]) / np.sqrt(2)


def scene():
    """Near birds, far birds, movement and the forest's own background."""
    near = whip_bird() + hooting_bird() + piping_bird() + chirping_bird() + chucks()
    far = swooping_bird() + thin_whistlers() + hoarse_birds() + far_bird() + trills()
    movement = wings() + thuds() + leaves() + leaf_ticks()
    background = insects() + drone() + air()
    return near + far + movement + background


def record(dry):
    """The recorder's band limit: a steep low-pass filter."""
    low_pass = signal.firwin(511, EDGE_HZ, window=("kaiser", 9), fs=SR)
    return signal.oaconvolve(dry, low_pass[None], "same", axes=1)


dry = scene()
out = record(dry)
log_audio(out)
```